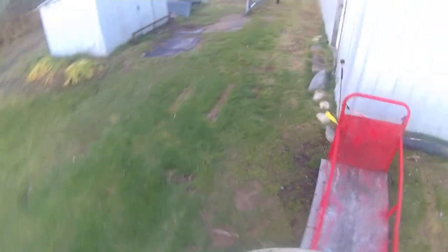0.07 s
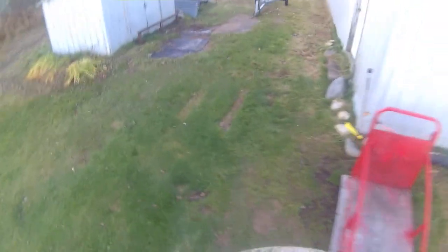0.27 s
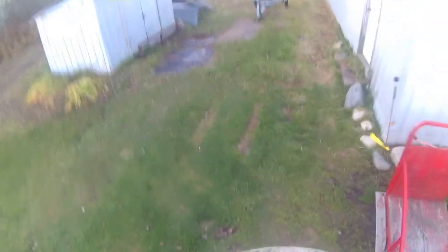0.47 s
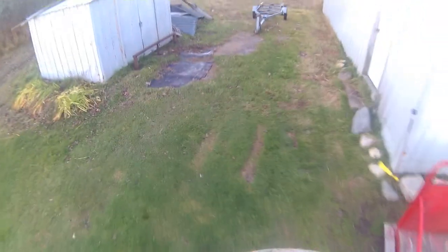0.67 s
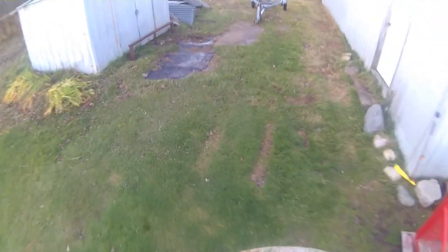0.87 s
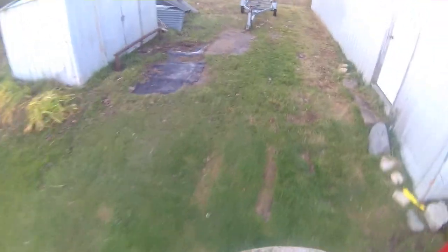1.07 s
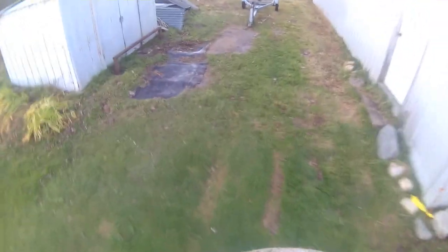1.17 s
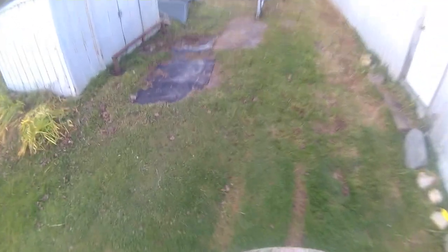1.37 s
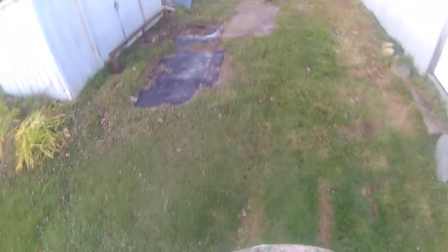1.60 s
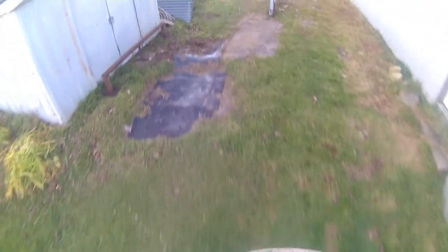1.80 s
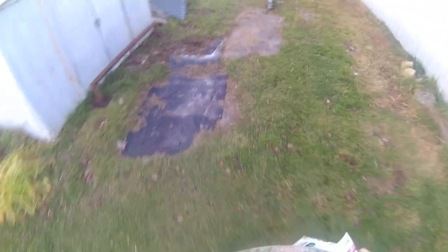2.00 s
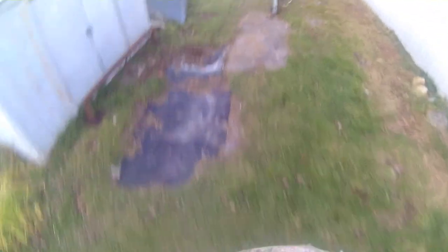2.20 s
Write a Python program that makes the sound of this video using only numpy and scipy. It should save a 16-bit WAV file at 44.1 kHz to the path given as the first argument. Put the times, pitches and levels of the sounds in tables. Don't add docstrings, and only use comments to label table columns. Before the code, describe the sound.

Someone walks across a lawn, dull thumps and light plastic clicks over quiet hiss and wind

```python
import sys
import numpy as np
from scipy import signal
from scipy.fft import rfft, irfft
from scipy.io import wavfile

SR = 44100
rng = np.random.default_rng(int(sys.argv[2]) if len(sys.argv) > 2 else 0)


def gain_from_decibels(decibels):
    exponent = np.asarray(decibels, float) / 20
    return 10 ** exponent


def bounce(signal):
    frames = np.transpose(np.atleast_2d(signal))
    limited = np.clip(frames, -1, 1)
    pcm = np.round(limited * 32767).astype(np.int16)
    wavfile.write(sys.argv[1], SR, pcm)


N = 99225

# pitch in Hz, level in dB, time to fall 60 dB in seconds.
HOUSING_LOW = [
    (1281, -4, 0.027),
    (1440, -3.5, 0.01),
    (1670, -7, 0.02),
    (1937, -4.5, 0.022),
]
# pitch in Hz, level in dB, time to fall 60 dB in seconds.
HOUSING_HIGH = [
    (2860, 3, 0.0057),
    (3700, -6, 0.0086),
    (4200, -15, 0.0078),
    (5870, -11, 0.0034),
    (6700, -23, 0.005),
]
TICK_SCATTER_DB = 2


def rms_one(x):
    return x / np.sqrt(np.mean(x ** 2) + 1e-20)


def drift(rate):
    r = np.exp(-80 * np.pi * rate / SR)
    slow = signal.lfilter([1], [1, -2 * r, r * r], rng.standard_normal(N // 40 + 2002))[2000:]
    return np.interp(np.arange(N) / 40, np.arange(len(slow)), rms_one(slow - slow.mean()))


def ring(clicks, hz, t60):
    r = gain_from_decibels(-60 / (t60 * SR))
    w = 2 * np.pi * hz / SR
    return signal.lfilter([0, np.sin(w)], [1, -2 * r * np.cos(w), r * r], clicks + 1e-18)


def train(s, sizes):
    return np.bincount((np.asarray(s) * SR).astype(int), sizes, N)[:N]


def band(x, low_hz, high_hz):
    return signal.sosfilt(signal.butter(2, [low_hz, high_hz], "band", fs=SR, output="sos"), x)


def scatter_tail(x, decay_s):
    puff = rng.standard_normal(600) * np.exp(-np.arange(600) / SR / decay_s)
    return signal.fftconvolve(x, puff / np.sqrt(np.sum(puff ** 2)))[:N]


def whine():
    # pitch in Hz, rms level in dB.
    lines = [
        (15422, -99),
        (15478, -91),
        (15536, -99),
    ]
    hump_hz, hump_width_hz, hump_db = 15500, 600, -86.5
    t = np.arange(N) / SR
    hump_t60 = np.log(1000) / np.pi / hump_width_hz
    hump = rms_one(ring(rng.standard_normal(N), hump_hz, hump_t60))
    tones = sum(gain_from_decibels(db) * np.sqrt(2) * np.sin(2 * np.pi * hz * t) for hz, db in lines)
    return gain_from_decibels(hump_db) * hump + tones


def air():
    # pitch in Hz, level in dB per Hz.
    colour_points = [
        (12, -48),
        (20, 11.5),
        (153, -3.5),
        (453, -13),
        (520, -13.5),
        (727, -16),
        (1340, -18.5),
        (1460, -22.5),
        (15600, -32),
    ]
    # time in seconds, level in dB.
    wind = [(0.0, -65.5), (0.12, -67), (0.2, -64), (0.22, -65.5), (0.64, -67), (0.66, -66), (0.76, -64),
            (0.8, -65.5), (1.37, -68), (1.4, -66.5), (1.55, -67.5), (1.59, -68), (1.71, -67.5), (1.75, -71),
            (1.81, -60), (1.83, -62), (2.05, -70), (2.25, -66.5)]
    rumble_cut_hz, gust_top_hz, gust_db, level_db = 45, 250, .7, -60.5
    hz = np.maximum(np.arange(N // 2 + 1) * SR / N, 1)
    point_hz, point_db = np.transpose(colour_points)
    colour = gain_from_decibels(np.interp(np.log(hz), np.log(point_hz), point_db))
    colour = colour / np.sqrt(1 + (rumble_cut_hz / hz) ** 4)
    low = 1 / np.sqrt(1 + (hz / gust_top_hz) ** 4)
    high = np.sqrt(1 - low ** 2)

    s, db = np.transpose(wind)
    wind_db = np.interp(np.arange(N) / SR, s, db - db.mean())
    rumble = irfft(rfft(rng.standard_normal(N)) * colour * low, N)
    rumble = rumble * gain_from_decibels(gust_db * drift(15.0) + wind_db)
    hiss = irfft(rfft(rng.standard_normal(N)) * colour * high, N)
    return gain_from_decibels(level_db) * rms_one(rumble + hiss)


def cricket():
    # pitch in Hz, level in dB, time to fall 60 dB in seconds.
    wing = [
        (11300, 0, .006),
        (11800, -1, .006),
        (12400, -4, .005),
        (13200, -8, .004),
        (10000, -11, .005),
    ]
    # start in seconds, length in seconds, level in dB.
    buzzes = [
        (1.127, 0.046, -70),
        (1.433, 0.041, -70),
        (1.806, .04, -71),
        (2.064, 0.05, -70),
    ]
    # time in seconds, peak level in dB.
    single_ticks = [
        (0.2746, -56.5),
        (0.2992, -56),
        (0.5037, -56.5),
        (0.5332, -60),
        (0.808, -56),
        (1.1061, -54),
        (1.1174, -56),
        (.288, -62),
        (1.189, -62),
    ]
    teeth_per_s, tooth_jitter, tooth_spread_db, swell = 280, .15, 2.5, .15
    tick_db, tick_ring = 2.5, .45
    echo_db, echo_s = -1.5, .004
    low_cut_hz, top_hz = 9300, 14600

    sound = np.zeros(N)
    for start, length, db in buzzes:
        jitter = tooth_jitter * rng.standard_normal(20)
        s = (np.arange(20) + np.clip(.3 + jitter, 0, 1)) / teeth_per_s
        stroke = np.sin(np.pi * np.clip(s / length, 0, 1)) ** swell
        run = np.zeros(N)
        for k, (hz, mode_db, t60) in enumerate(wing):
            tooth_db = mode_db + tooth_spread_db * rng.standard_normal(20)
            run += ring(train(start + s, stroke * (-1) ** k * gain_from_decibels(tooth_db)), hz, t60)
        sound += gain_from_decibels(db) * rms_one(run) * np.sqrt(length * SR / N)

    s, db = np.transpose(single_ticks)
    for k, (hz, mode_db, t60) in enumerate(wing):
        sizes = (-1) ** k * gain_from_decibels(db + tick_db + mode_db / 2)
        sound += ring(train(s, sizes), hz, t60 * tick_ring)

    sound = sound + gain_from_decibels(echo_db) * scatter_tail(sound, echo_s)
    return band(band(sound, low_cut_hz, top_hz), low_cut_hz, top_hz)


def grains(per_s, clump):
    spread_db = 3
    sizes = gain_from_decibels(spread_db * np.minimum(rng.exponential(1, N), 4)) * rng.choice([-1, 1], N)
    return (rng.random(N) < per_s * clump / SR) * sizes


def rubbed_housing(modes, shared, clump):
    ring_share = 0.67
    sound = np.zeros(N)
    for hz, mode_db, t60 in modes:
        sound += gain_from_decibels(mode_db) * ring(grains(500, clump) + shared, hz, t60 * ring_share)
    return rms_one(sound)


def rustle():
    # time in seconds, level in dB, level of the bright tones against the deep ones in dB.
    rubbing = [(0, -81, -6), (.2, -78, -14), (.32, -70.5, -14), (.45, -90, -10), (.62, -80, -23),
               (.8, -73.5, -15), (.93, -76, -25), (1.04, -73, -4), (1.12, -70.5, -8), (1.22, -79.5, -4),
               (1.34, -68.5, -8), (1.45, -75.5, -18), (1.53, -68.5, -12), (1.62, -79, -23), (1.78, -71, -5),
               (1.88, -73, -7), (2.0, -74, -9), (2.25, -97, -25)]
    s, db, bright_db = np.transpose(rubbing)
    t = np.arange(N) / SR
    clump = gain_from_decibels(1.5 * drift(40))
    shared = gain_from_decibels(-4.5) * grains(200, clump)
    low = rubbed_housing(HOUSING_LOW, shared, clump)
    high = rubbed_housing(HOUSING_HIGH, shared, clump)
    return gain_from_decibels(np.interp(t, s, db) - 1) * (low + gain_from_decibels(np.interp(t, s, bright_db)) * high)


def knocks():
    # time in seconds, peak level in dB, level of the two lower tones in dB, of the two upper in dB.
    touches = [(0.181, -48.5, -16, -4), (0.266, -60.5, -5, -17), (0.2992, -72, -15, -18),
               (0.3246, -56.5, -1.5, -14), (0.4100, -47.5, -9, -6), (0.6866, -61, -5, -23),
               (0.835, -61, -1.5, -17), (0.857, -47, -4, -18), (1.005, -64, -4, -19), (1.0234, -55, -4, -4),
               (1.055, -56.5, -16, 7.5), (1.0773, -62, -2, -12), (1.117, -54.5, -2, -22),
               (1.1695, -56, -1.5, 6), (1.1894, -45.5, -10.5, -0.5), (1.279, -61.5, 2.5, -10),
               (1.324, -61, 0.5, -15), (1.3635, -55, -2.5, 4), (1.4138, -57, -3.5, -9),
               (1.437, -63, -4, -22), (1.49, -55, -9, -23), (1.5293, -59, -5, -10), (1.8373, -67, -5, -19),
               (1.868, -53.5, -6.5, -2), (1.8833, -57.5, -0.5, -19), (1.9718, -53, -23, 3),
               (1.9834, -54.5, -9, 3.5), (2.0578, -54, -19, 5), (2.108, -59, -22, 4), (2.234, -62, -6, -8),
               (.727, -67, -11, -16), (1.033, -61, -6, -18), (1.066, -65, -23, -2), (1.1718, -62, -5, -17),
               (1.297, -63, -3, -12), (1.33, -65, -9, -14), (1.370, -58, -5, 0), (1.378, -58, -8, 0),
               (1.385, -60, -5, -3), (1.4084, -54, -18, 2), (1.4450, -60.5, -4, -12), (1.506, -64, -9, -14),
               (1.518, -60, -5, -6), (1.540, -57.5, -3, -2), (1.56, -58, -9, 3), (1.631, -60.5, -4, -14),
               (1.787, -65, -9, -14), (1.925, -60.5, -5.5, -16), (1.936, -62, -5, -14),
               (2.2035, -63, -19, 7)]
    s, db, lower_db, upper_db = np.transpose(touches)
    levels = [lower_db + 4.5] * 2 + [upper_db - 4] * 2
    sound = np.zeros(N)
    for tone_db, (hz, mode_db, t60) in zip(levels, HOUSING_LOW):
        scatter = TICK_SCATTER_DB * rng.standard_normal(len(s))
        sound += ring(train(s, gain_from_decibels(db + tone_db + mode_db + scatter)), hz, t60)
    return band(sound, 900, 2600)


def snaps():
    # time in seconds, peak level in dB, pitch in Hz, time to fall 60 dB in seconds.
    stalks = [(0.4093, -50, 4200, 0.0054), (0.409, -64, 6160, .004), (0.4102, -49, 2870, 0.0037),
              (.4095, -65, 4850, 0.0025), (.4112, -61, 6700, 0.004), (.41, -63, 2320, .003),
              (0.617, -62, 3770, 0.027), (.623, -67, 3900, .02), (.62, -62, 2980, .015),
              (.679, -68, 2670, 0.022), (.792, -69, 3900, .006), (.844, -67, 3620, .005),
              (0.8322, -56, 3870, 0.011), (.857, -55.5, 3660, 0.0045), (0.994, -61, 3820, 0.011),
              (1.024, -58, 3220, 0.0074), (1.0434, -61, 3700, .006), (1.115, -59, 3350, .006),
              (1.063, -59, 3740, .015), (1.165, -55, 3500, .005), (1.1683, -50, 3380, 0.0085),
              (1.174, -58, 5900, .005), (1.1746, -59, 2800, .005), (1.169, -50, 5850, 0.0073),
              (1.1895, -53, 6300, 0.0058), (1.1884, -62, 3900, .004), (1.256, -58.5, 4300, 0.0093),
              (1.263, -58, 3550, 0.0066), (1.278, -61, 3700, .008), (1.366, -57, 3750, .006),
              (1.4057, -59, 6150, 0.011), (1.529, -60, 3850, .01), (1.5596, -54, 4100, 0.0059),
              (1.712, -62, 2800, 0.0065), (1.739, -57, 3540, 0.0071), (1.8518, -54, 4130, 0.0057),
              (1.853, -58, 5500, .005), (1.835, -59, 4400, .006), (1.8676, -55, 5600, .005),
              (1.868, -55, 4030, 0.0068), (1.915, -55, 3750, 0.009), (1.955, -58, 6000, .005),
              (1.9713, -46.5, 3700, 0.0036), (1.9716, -60, 6200, .005), (1.984, -54, 4200, .006),
              (1.985, -59, 5800, .005), (1.995, -56, 4000, .007), (2.057, -61, 3100, .005),
              (2.028, -56.5, 3700, 0.0058), (2.147, -59, 3080, .005), (2.2341, -52, 3670, 0.0036)]
    pitch_db, body_db, crack_db, crack_s = -2.5, -14.5, 6.5, 0.00094
    s, db, _, _ = np.transpose(stalks)
    sound = scatter_tail(train(s, gain_from_decibels(db + crack_db)), crack_s)
    for hz, mode_db, t60 in HOUSING_HIGH:
        scatter = 2 * TICK_SCATTER_DB * rng.standard_normal(len(s))
        sound += ring(train(s, gain_from_decibels(db + body_db + mode_db + scatter)), hz, t60)
    for at, peak_db, hz, t60 in stalks:
        sound += ring(train([at], [gain_from_decibels(peak_db + pitch_db)]), hz, t60)
    return band(sound, 2300, 7500)


def thumps():
    # time in seconds, peak level in dB, sway in Hz, time to fall 60 dB in seconds.
    jolts = [(.005, -50.5, 32.6, 1), (0.105, -48, 33.9, 0.5), (.158, -34, 27.6, 0.46),
             (0.193, -29.5, 26.6, 0.088), (0.308, -40, 24, 0.069), (.05, -83, 24, 0.13),
             (.4, -59, 26.1, 0.084), (0.561, -53.5, 29.4, 0.24), (.93, -68, 27.8, .2),
             (0.611, -52.5, 24.5, 0.33), (0.7175, -45.5, 25.3, 0.51), (.72, -61, 44.7, 0.077),
             (0.759, -39.5, 23, 0.2), (0.812, -44, 26.4, 0.18), (1.041, -57, 31.6, 0.31),
             (1.122, -48, 22.9, 0.48), (1.126, -59, 45, 0.093), (1.243, -46.5, 27, 0.42),
             (1.289, -41.5, 30.6, 0.28), (1.323, -43.5, 30, 0.064), (1.411, -42.5, 21.5, 0.19),
             (1.641, -47, 36.2, 0.067), (1.7, -50.5, 26.2, 0.092), (1.791, -42.5, 32.8, 0.38),
             (1.849, -44.5, 30, 0.35), (1.946, -41, 21, 0.22), (2.03, -53.5, 40, 0.16), (2.17, -54, 26, .2)]
    soft_hz = 105
    sway = sum(ring(train([s], [gain_from_decibels(db)]), hz, t60) for s, db, hz, t60 in jolts)
    return signal.sosfilt(signal.butter(2, soft_hz, fs=SR, output="sos"), sway)


def scene():
    background = whine() + air() + cricket()
    touching = rustle() + knocks() + snaps()
    return (background + touching + thumps())[None]


def top_cut(x):
    return signal.sosfilt(signal.butter(12, 15710, fs=SR, output="sos"), x)


def record(dry):
    return top_cut(dry)


dry = scene()
out = record(dry)
bounce(out)
```